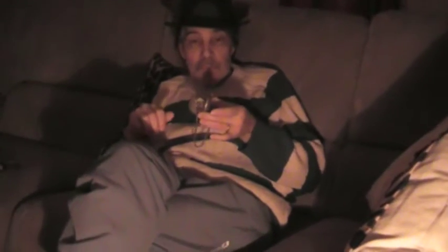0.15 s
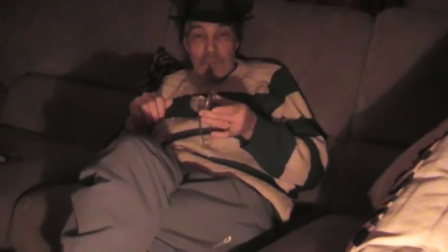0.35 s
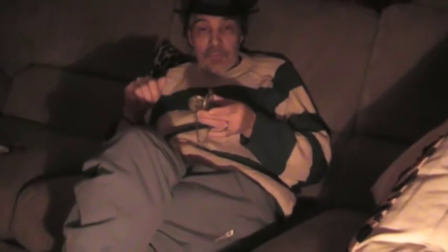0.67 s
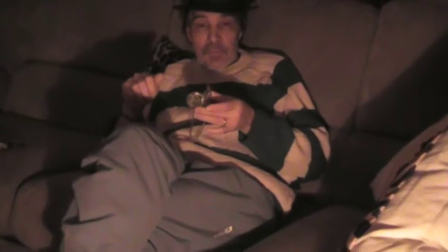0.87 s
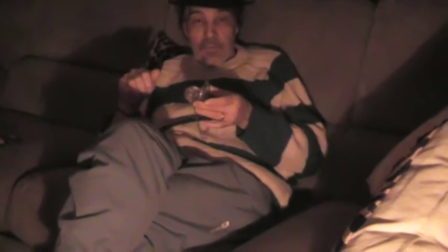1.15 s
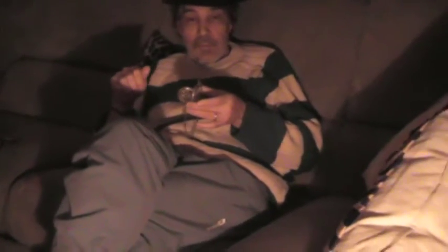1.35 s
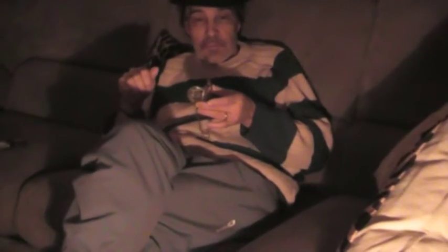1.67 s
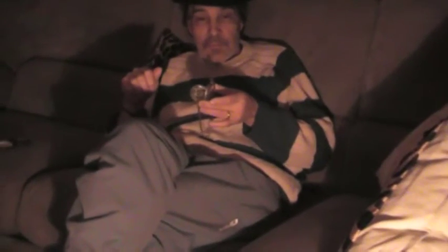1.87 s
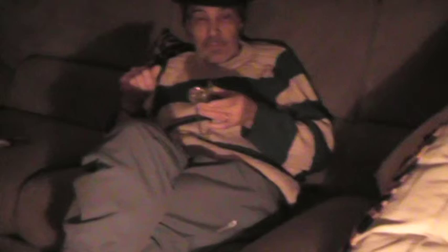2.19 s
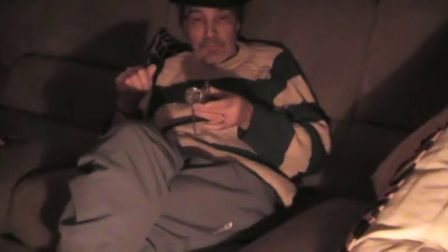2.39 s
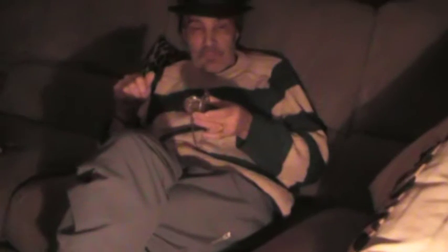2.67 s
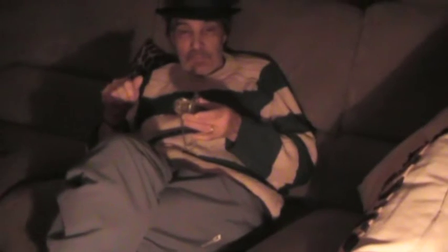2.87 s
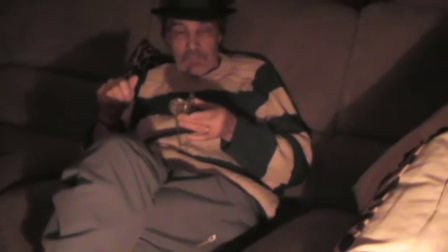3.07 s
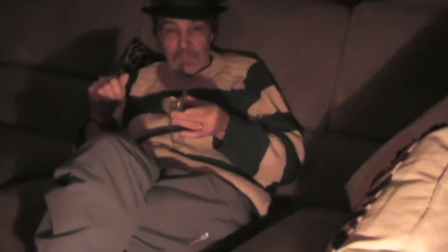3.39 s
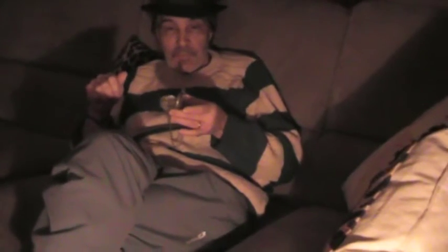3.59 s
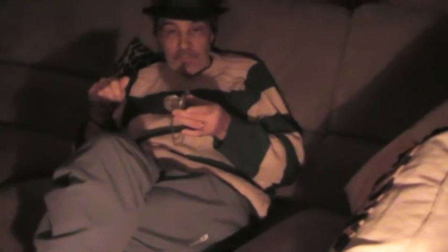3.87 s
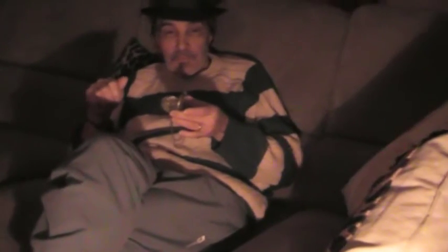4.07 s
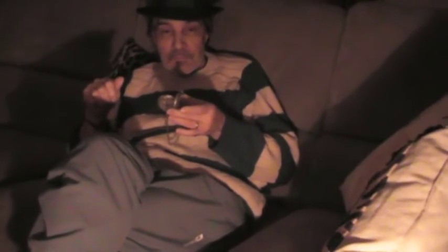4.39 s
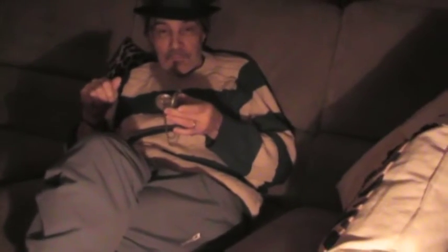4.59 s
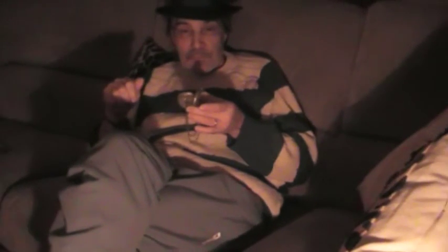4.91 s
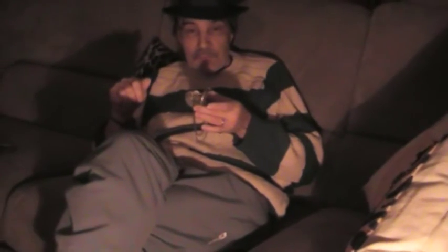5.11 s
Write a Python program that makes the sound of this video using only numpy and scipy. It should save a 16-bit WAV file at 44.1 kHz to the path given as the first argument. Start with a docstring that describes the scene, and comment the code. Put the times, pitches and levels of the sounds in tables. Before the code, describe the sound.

Close handling noise: soft finger rustles and a short creak, then bright metallic clicks and dull hollow bumps over a faint room hush.

```python
"""Pocket watch and chain, handled close to the microphones

In a quiet, soft-furnished room metal parts snap and links tick: gritty noise and ringing case modes.
Fingers slide (juddering noise) and creak on the plastic housing around the two microphones; jolted by
a fingertip or now and then by a snap, it answers with a hollow note (damped modes). A lens motor
whines briefly in steps (sine bursts). Behind it all lies the room's faint hush (coloured noise)."""
import sys
import numpy as np
from scipy import signal
from scipy.fft import rfft, irfft
from scipy.io import wavfile

SR = 44100
rng = np.random.default_rng(int(sys.argv[2]) if len(sys.argv) > 2 else 0)


def output_pcm(signal):
    """Save a mono or channel-first signal as 16-bit PCM at the path in sys.argv[1].

    Samples are clipped to [-1, 1] before scaling.
    """
    pcm = np.clip(np.atleast_2d(signal).T, -1, 1) * 32767
    wavfile.write(sys.argv[1], SR, np.round(pcm).astype(np.int16))


N = 231254
T = np.arange(N) / SR  # seconds

# likeness of near sounds at the two microphone ports: (f/Hz, likeness -1..1)
LIKENESS = [(100, 1), (300, 0.7), (600, 0.28), (1200, 0.12), (2200, 0.86), (3300, 0.82), (6500, 0.5),
            (8200, 0.5), (10500, -.5), (12500, 0.6), (15000, -0.6)]
# relative spectrum of the housing's noisy body sound: (f/Hz, density/dB per Hz)
BODY = [(40, -39), (120, -24.5), (230, -16), (310, -14), (420, -18.5), (510, -7.5), (570, 0.5), (640, -7.5),
        (700, -11.5), (790, -10.5), (1000, -14.5), (1500, -26), (3000, -35.5), (8000, -58.5)]


def from_db(db):
    """Turn decibels into a gain."""
    return 10 ** (np.asarray(db) / 20)


def rms_one(x):
    """Scale a signal to rms 1."""
    return x / np.sqrt(np.mean(x ** 2) + 1e-20)


def at_hz(points, hz):
    """Read a spectrum on a log-frequency axis."""
    knots, values = np.transpose(points)
    return np.interp(np.log(hz + 1), np.log(knots), values)


def pan(db):
    """Left and right gains for a left-minus-right level difference in dB."""
    return from_db(np.array([[.5], [-.5]]) * db)


def add(out, s, sound):
    """Mix a short stereo sound in at s seconds."""
    start = int(np.clip(round(s * SR), 0, N - 1))
    out[:, start:start + sound.shape[1]] += sound[:, :N - start]


def noise(spectrum, likeness=LIKENESS, balance=None, peaks=(), size=N):
    """Coloured noise as the two ports hear it, partly alike at each frequency; rms 1."""
    # balance of near sounds at the ports: (f/Hz, left minus right/dB)
    near_balance = [(60, -3), (180, -6), (330, -2.5), (550, 4), (1100, 0.5), (2700, 0.5), (6300, 3),
                    (10000, 3), (13000, -2.5)]
    if balance is None:
        balance = near_balance
    hz = np.fft.rfftfreq(size, 1 / SR)
    db = at_hz(spectrum, hz)
    for centre, width, lift in peaks:
        db = db + lift / (1 + (2 * (hz - centre) / width) ** 2)
    mid, side = rfft(rng.standard_normal((2, size)))
    alike = np.clip(at_hz(likeness, hz), -.98, .98)
    both = np.sqrt(1 + alike) * mid + np.sqrt(1 - alike) * side * [[1], [-1]]
    coloured = both * from_db(db) * pan(at_hz(balance, hz))
    return rms_one(irfft(coloured, size))


def strike(t, rise_s, t60):
    """A quick swell that dies away, 60 dB in t60 seconds."""
    return (1 - np.exp(-t / rise_s)) * from_db(-60 * t / t60)


def watch(link_db=-4, link_room_db=-28):
    """Snaps of the case and ticks of the chain: metal contacts, each with its room tail."""
    # sharp metal snaps: (t/s, level/dB, centre of brightness f/Hz, room tail level/dB under the snap)
    snaps = [(2.7301, -19, 2200, -12), (2.7363, -14.5, 12000, -34), (2.7585, -21.5, 1914, -25),
             (2.7636, -14.5, 2312, -32), (4.0169, -15, 9900, -28), (4.4579, -9, 5090, -23.5),
             (5.1803, -14.5, 1810, -27.5)]
    out = np.zeros((2, N))
    for s, db, bright_hz, room_db in snaps:
        snap = metal_click(bright_hz, octaves=1.4, grit_db=-1, grit_t60=0.015, damping=0.92)
        add(out, s, from_db(db) * snap)
        add(out, s, from_db(db + room_db) * room(bright_hz))
    for s, db, bright_hz in link_ticks():
        tick = metal_click(bright_hz, octaves=0.96, grit_db=0, grit_t60=0.0083, damping=1.6)
        add(out, s, from_db(db + link_db) * tick)
        add(out, s, from_db(db + link_db + link_room_db) * room(bright_hz))
    return out


def link_ticks(gap_s=0.017, follower_db=-6, follower_spread_db=2):
    """A shift of the chain is one tick, often with weaker ones at uneven gaps: rows (t/s, level/dB, f/Hz)."""
    # chain shifts: (t/s, first tick's level/dB before link_db, centre of brightness f/Hz, count of ticks)
    links = [(0.294, -42, 10500, 1), (0.602, -46.5, 4510, 1), (1.3536, -50, 3900, 1),
             (1.483, -30.5, 4950, 1), (1.504, -25.5, 3150, 5), (1.5966, -37.5, 3970, 1),
             (1.9395, -39, 6840, 5), (2.0918, -40.5, 5660, 1), (2.6823, -34.5, 2980, 1),
             (2.784, -32, 4200, 1), (2.8718, -35.5, 3370, 1), (3.229, -41, 10500, 1),
             (3.4216, -35, 4020, 1), (3.8433, -43, 5000, 6), (5.006, -43, 6000, 4), (5.1226, -33, 4200, 3)]
    ticks = []
    for s, db, bright_hz, count in links:
        ticks.append((s, db, bright_hz))
        for _ in range(round(count) - 1):
            s = s + gap_s * rng.uniform(0.52, 1.5)
            follower = db + follower_db + follower_spread_db * rng.normal()
            ticks.append((s, follower, bright_hz))
    return ticks


def metal_click(bright_hz, octaves, grit_db, grit_t60, damping):
    """One metal contact: a gritty crack and the case's short ring, strongest near bright_hz."""
    # resonances of the watch case: (f/Hz, width/Hz before damping, relative level/dB before focus)
    case = [(1460, 170, -1.5), (2000, 220, -2), (2790, 180, -5), (3080, 290, -5.5), (4440, 280, -6.5),
            (5000, 300, -10), (5940, 270, 0), (7020, 310, -7), (7880, 250, -7), (9260, 860, -4.5),
            (10630, 200, 1), (13000, 300, -6), (11800, 420, -8.5)]
    t = T[:2048]
    hz, width, db = np.transpose(case)
    db = db + focus(hz, bright_hz, octaves)

    # short waves reach the two ports out of step
    port_lag = np.arccos(np.clip(at_hz(LIKENESS, hz), -1, 1))
    phase = rng.uniform(0, 2 * np.pi, len(hz)) + np.array([[.5], [-.5]]) * port_lag
    waves = np.sin(2 * np.pi * hz[:, None] * t + phase[:, :, None])
    decay = np.exp(-np.pi * damping * width[:, None] * t)
    ring = np.sum(from_db(db)[:, None] * decay * waves, axis=1)

    grit_spectrum = np.column_stack([np.r_[200, hz], np.r_[db[0] - 20, db]])
    grit = noise(grit_spectrum, size=len(t)) * from_db(-60 * t / grit_t60)
    click = rms_one(ring) + from_db(grit_db) * rms_one(grit)
    click = click * (1 - np.exp(-t / 0.0001))
    # so small a part radiates little bass
    click = signal.sosfilt(signal.butter(2, 500, "high", fs=SR, output="sos"), click)
    # equal energy for every click, as if spread over 5 ms
    return click / np.sqrt(np.sum(click ** 2) / (0.005 * SR))


def focus(hz, bright_hz, octaves):
    """Gain in dB, falling away from the frequency that a contact excites best."""
    return -6 * np.abs(np.log2(hz / bright_hz) / octaves) ** 2.3


def room(bright_hz, octaves=1.32, t60=0.28, linger_hz=4850, linger_db=-9, linger_t60=0.49):
    """Diffuse tail of a click; one bright band lingers a little longer than the rest."""
    # relative spectrum of the tail before focus: (f/Hz, density/dB per Hz)
    tail_spectrum = [(200, -14), (600, -2), (1300, 7.5), (2500, 0), (3700, -5), (4800, -2), (6300, -5),
                     (8000, -4), (11000, -2), (14000, -9), (16000, -17.5)]
    t = T[:16384]
    even = [(100, 0), (10000, 0)]
    hz, db = np.transpose(tail_spectrum)
    focused = np.column_stack([hz, db + focus(hz, bright_hz, octaves)])
    hiss = noise(focused, balance=even, size=len(t))
    band_spectrum = [(linger_hz / 2, -45), (linger_hz * 0.9, -11), (linger_hz, 0),
                     (linger_hz * 1.2, -11), (linger_hz * 2, -45)]
    band = noise(band_spectrum, balance=even, size=len(t))
    band_gain = from_db(linger_db + focus(linger_hz, bright_hz, 0.4))
    return hiss * strike(t, .003, t60) + band_gain * band * strike(t, .003, linger_t60)


def knocks(thump_db=1, crack_db=6, after_db=-27, thud_db=-32.5, thud_follows=0.48):
    """A fingertip, or now and then a snap of the watch, jolts the housing: crack, thump, thud, after-ring."""
    # jolts: (t/s, thump level/dB before thump_db, crack level/dB before crack_db, left minus right/dB)
    jolts = [(2.035, -38.5, -49.5, -1), (2.204, -27.5, -44, 5), (2.285, -32, -51, 1),
             (2.734, -2.5, -13, 0.5), (2.8003, -12.5, -23, 2), (2.849, -24, -32.5, -6),
             (2.896, -22, -39.5, 11), (2.967, -32, -49.5, 3), (2.988, -34, -50.5, 5.5),
             (3.326, -26, -45.5, -5), (3.356, -23.5, -51, 6), (3.421, -33.5, -48, 4),
             (3.692, -32, -48.5, 5.5), (3.882, -37.5, -49, 2), (3.954, -11, -27.5, 3.5),
             (4.02, -23.5, -43.5, 10.5), (4.247, -24, -40.5, 7.5), (4.312, -43, -57, 8),
             (4.466, -30, -41, 8.5), (4.709, -33.5, -57.5, 2.5), (4.861, -27.5, -40, 6.5),
             (5.124, -42, -47, 3), (5.178, -21.5, -24, 1.5), (5.238, -24.5, -47, 5)]
    # relative spectrum of the crack: (f/Hz, density/dB per Hz)
    crack_spectrum = [(60, -33.5), (300, -5.5), (800, 8.5), (1600, 0), (2600, -8.5), (4000, -13),
                      (6200, -21.5), (9000, -26.5), (15000, -40)]
    # relative spectrum of the low thud: (f/Hz, density/dB per Hz)
    thud_spectrum = [(20, -23), (50, -8.5), (120, 0.5), (210, 3), (300, -3.5), (600, -28), (3000, -81)]
    out, t = np.zeros((2, N)), T[:8192]
    for s, db, contact_db, place_db in list(jolts) + creak():
        thump = hollow_thump(t)
        thump = pan(place_db) * thump / np.max(np.abs(thump))
        after = from_db(after_db) * noise(BODY, size=len(t)) * strike(t, 0.0023, .28)
        crack = noise(crack_spectrum, size=len(t)) * strike(t, 0.00025, 0.051)
        thud = noise(thud_spectrum, size=len(t)) * strike(t, 0.0009, 0.19)
        add(out, s, from_db(db + thump_db) * (thump + after))
        add(out, s, from_db(contact_db + crack_db) * crack)
        # the thud grows more slowly than the thump
        add(out, s, from_db(thud_db + thud_follows * db) * thud)
    return out


def hollow_thump(t, rise_s=0.0015, detune=0.033, port_phase=0.46):
    """The jolted shell's damped modes, out of step at the two ports."""
    # nominal housing modes: (f/Hz, relative level/dB, t60/s, left minus right/dB)
    housing = [(289.4, -21, 0.065, -9.5), (373.2, -21, 0.097, -8.5), (568.5, 2, 0.048, -1.5),
               (675, -0.5, 0.026, 2.5), (723, -6, 0.038, -6), (980, -19.5, 0.071, -3.5),
               (1290, -22.5, 0.038, 1.5), (1565, -25.5, .06, -4), (2500, -32.5, 0.041, -5.5)]
    thump = 0
    for k, (hz, mode_db, t60, side_db) in enumerate(housing):
        # pitch and strength of each mode vary a little from jolt to jolt
        pitch = hz * (1 + detune * rng.normal())
        strength = from_db(mode_db + 1.0 * rng.normal())
        phase = np.array([[1], [-1]]) * port_phase * hz / 560
        wave = np.sin(2 * np.pi * pitch * t + phase)
        thump = thump + (-1) ** k * strength * pan(side_db) * wave * strike(t, rise_s, t60)
    return thump


def creak(count=7, start_s=1.481, gap_s=0.0165, jitter_s=0.0012,
          middle_db=-7.5, ends_db=-10, crack_db=-15.5, place_db=4.5):
    """A hard-pressed finger slips nearly evenly, loudest midway; each slip is a row like a knock's."""
    s = start_s + gap_s * np.arange(count) + jitter_s * rng.standard_normal(count)
    db = middle_db + ends_db * np.linspace(-1, 1, count) ** 2
    return [(at, level, level + crack_db, place_db) for at, level in zip(s, db)]


def fingers(body_db=-1, hiss_db=-1, judder_db=3, grip_db=-42, judder_rate_hz=130):
    """Skin glides smoothly under a light touch and judders when pressed harder."""
    # strokes: (start t/s, length/s, body level/dB before body_db, skin hiss level/dB before hiss_db)
    strokes = [(0.0, 0.13, -47, -49.5), (0.174, 0.072, -42, -48), (0.275, 0.1, -51.5, -55.5),
               (0.386, 0.26, -47, -50.5), (0.644, 0.42, -50, -56), (1.407, 0.076, -47, -53.5),
               (1.482, 0.096, -24, -40.5), (1.625, 0.052, -47.5, -55.5), (1.941, 0.06, -47.5, -52.5),
               (2.056, 0.058, -37.5, -50.5), (2.182, 0.078, -36.5, -53.5), (2.318, 0.056, -31, -44.5),
               (2.427, 0.12, -46.5, -56.5), (2.585, 0.073, -35.5, -48), (2.715, 0.044, -22.5, -38),
               (2.865, 0.054, -31, -54), (3.338, 0.046, -33, -54), (3.77, 0.012, -55, -60),
               (3.876, 0.065, -51, -57), (4.996, 0.069, -52.5, -63.5), (5.134, 0.074, -42, -55.5)]
    # relative spectrum of the skin hiss: (f/Hz, density/dB per Hz)
    skin = [(100, -36.5), (700, -17), (1100, -5.5), (1450, 2), (1800, -7.5), (3000, -5.5), (4900, -10),
            (6400, -6.5), (7900, -15.5), (9600, -7.5), (11700, -12.5), (13500, -30.5), (16000, -36.5)]
    # narrow resonances that colour the rubbing: (f/Hz, width/Hz, lift/dB)
    shell_peaks = [(275, 50, 3), (585, 40, 2), (760, 50, 4), (1430, 150, 2), (2510, 170, 7), (3780, 300, 6),
                   (4450, 200, 5)]
    # up to 2.9 s the hand rests lightly on the housing between strokes
    resting = T < 2.9
    body, hiss = resting * from_db(-58), resting * from_db(-65)
    for start, length, pressure_db, skin_db in strokes:
        pressed = stroke(start, length, swell_s=0.011, release_s=0.022)
        body = np.maximum(body, from_db(pressure_db) * pressed)
        brushed = stroke(start, length, swell_s=0.021, release_s=0.033)
        hiss = np.maximum(hiss, from_db(skin_db) * brushed)
    grip = body / (body + from_db(grip_db))  # 0 is a light touch, 1 a firm one
    judder = from_db(judder_db * grip * drift(judder_rate_hz) - 3.1 * grip)
    rub = from_db(body_db) * body * noise(BODY, peaks=shell_peaks)
    rustle = from_db(hiss_db) * hiss * noise(skin, peaks=shell_peaks)
    return judder * (rub + rustle)


def stroke(start, length, swell_s, release_s, ease_db_per_s=6):
    """Gain of one stroke over time: swell, slowly easing hold, release."""
    early = np.maximum(start - T, 0)
    late = np.maximum(T - start - length, 0)
    eased_db = ease_db_per_s * (np.clip(T - start, 0, length) - length / 2)
    return np.exp(-np.minimum(early / swell_s + late / release_s, 20)) * from_db(-eased_db)


def drift(rate_hz):
    """A random line through rate_hz new values a second; rms 1."""
    return rms_one(np.interp(T * rate_hz, np.arange(6000), rng.standard_normal(6000)))


def lens_motor(level_db=-6, half_length_s=0.0059, step_s=0.04):
    """The focus motor steps at a steady rate; each step is a brief, thin whine, equal at both ports."""
    # faint runs: (start t/s, pitch f/Hz, level/dB before level_db, count of steps)
    motor_runs = [(0.11, 1960, -49, 1), (0.468, 1960, -46, 3), (0.828, 1960, -48, 2), (3.505, 2300, -62, 4),
                  (4.268, 1980, -49, 1), (4.429, 1980, -49, 1), (4.748, 2820, -55.5, 2)]
    out = np.zeros(N)
    for start, hz, db, count in motor_runs:
        step = np.clip(np.round((T - start) / step_s), 0, round(count) - 1)
        nearest = start + step_s * step
        burst = np.exp(-np.minimum(((T - nearest) / half_length_s) ** 2, 20))
        out += from_db(db + level_db) * burst * np.sin(2 * np.pi * hz * T)
    return out


def hush(level_db=-58):
    """The quiet room's steady background: diffuse noise with a few soft resonances."""
    # relative spectrum of the hush: (f/Hz, density/dB per Hz)
    floor = [(22, -7.5), (50, -2), (130, -5), (300, -5.5), (480, -6), (700, -7), (1050, -7.5),
             (1450, -13.5), (2300, -14), (4000, -20), (8500, -22.5), (10300, -14.5), (13000, -33),
             (16500, -40.5)]
    # likeness of the hush at the two ports: (f/Hz, likeness -1..1)
    floor_likeness = [(50, 0.87), (300, .55), (1300, -0.26), (3000, 0.37), (7000, -0.0088), (10300, -0.81),
                      (14000, -0.34)]
    # resonances in the hush: (f/Hz, width/Hz, lift/dB)
    hush_peaks = [(835, 66, 9.9), (3030, 460, 4), (5760, 360, 4.4)]
    balance = [(100, -1.2), (8000, 2)]  # (f/Hz, left minus right/dB)
    return from_db(level_db) * noise(floor, floor_likeness, balance=balance, peaks=hush_peaks)


def scene():
    """Watch, chain and handling close by, over the room's faint hush."""
    return watch() + knocks() + fingers() + lens_motor() + hush()


def record(dry):
    """Peaks beyond full scale clip; a steep low-pass cuts the top above 16 kHz."""
    clipped = np.clip(dry, -1, 1)
    return signal.sosfilt(signal.ellip(10, .1, 70, 16000, fs=SR, output="sos"), clipped)


dry = scene()
out = record(dry)
output_pcm(out)
```